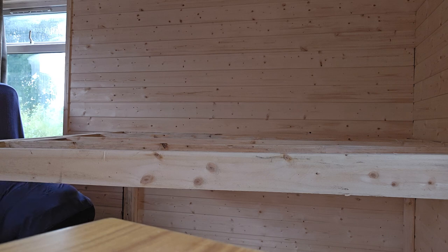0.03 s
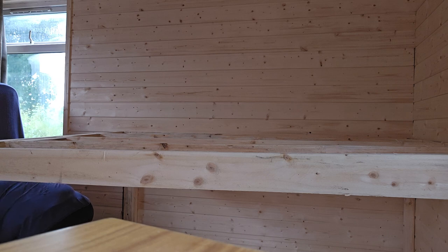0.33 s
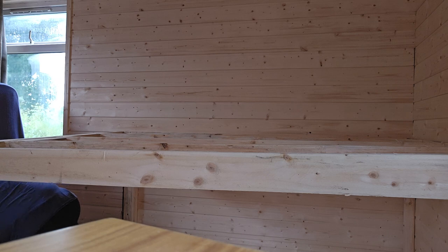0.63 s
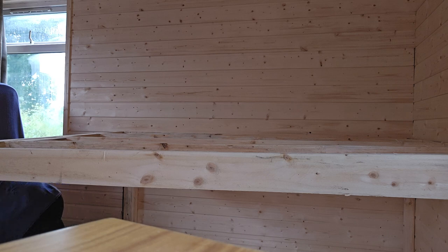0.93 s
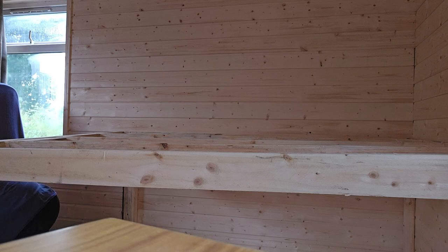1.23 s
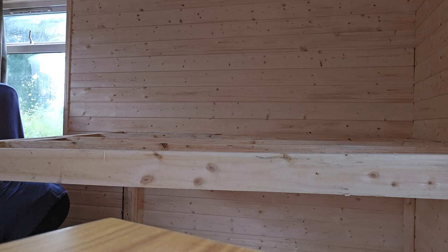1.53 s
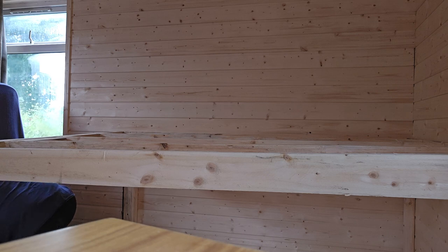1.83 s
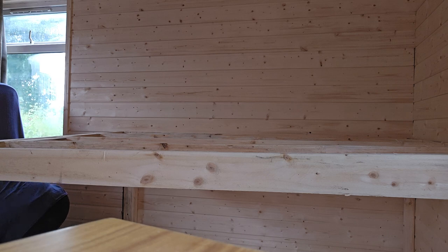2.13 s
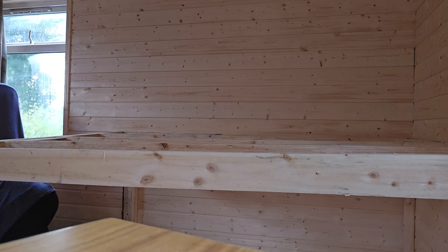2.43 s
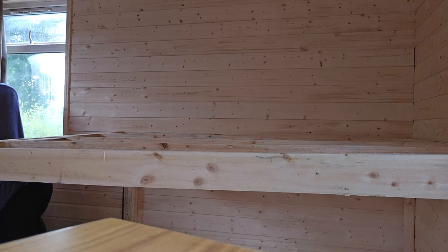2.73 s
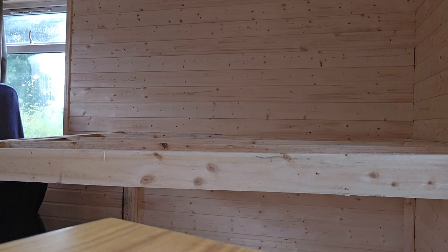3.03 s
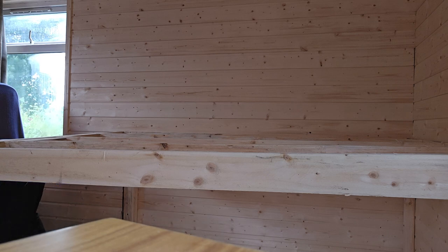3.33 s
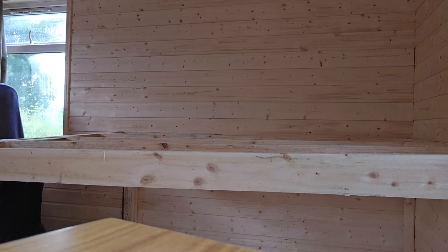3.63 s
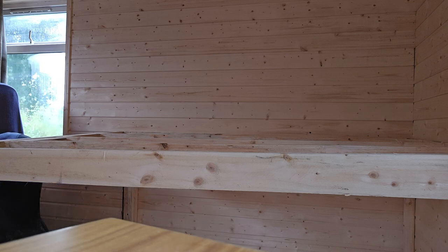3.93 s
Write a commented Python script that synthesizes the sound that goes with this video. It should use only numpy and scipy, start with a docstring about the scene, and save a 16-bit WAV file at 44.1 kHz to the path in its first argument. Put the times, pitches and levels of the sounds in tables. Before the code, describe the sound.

A wooden part drags and groans, then thumps down in a small wood-panelled room.

```python
"""A wooden part scrapes and groans over boards, then is set down with a thump. Light knocks and ticks
follow, then clothing rustles while the floor booms under shifting weight. Stick-slip and blows ring
the same board and floor modes; sliding wood and cloth hiss through tiny catches.
Small wood-panelled room, short reverb, low rumble and hum throughout."""
import sys
import numpy as np
from scipy import signal
from scipy.fft import rfft, irfft
from scipy.io import wavfile

SR = 44100
rng = np.random.default_rng(int(sys.argv[2]) if len(sys.argv) > 2 else 0)


def unload_wav(signal):
    """Save mono or channel-first audio to the path in sys.argv[1] as 16-bit WAV at rate SR, clipped to [-1, 1]."""
    wavfile.write(
        sys.argv[1],
        SR,
        np.round(np.clip(np.atleast_2d(signal).T, -1, 1) * 32767).astype(np.int16),
    )


N = 176400
T = np.arange(N) / SR

# background spectrum: f/Hz, level/dB
AMBIENCE_SPECTRUM = [(20, -7.5), (62, 2), (85, -7), (130, -13.5), (260, -20), (450, -25), (800, -25),
                     (1000, -29.5), (2400, -36), (7400, -39.5), (9800, -57.5), (15500, -51.5)]
# left-right likeness of diffuse sound: f/Hz, correlation/1
CORRELATION = [(60, 0.79), (130, 0.85), (260, 0.61), (500, 0.52), (1000, 0), (16000, 0.09)]
# cloth strokes: t/s, attack/s, hold/s, release/s, fibre level/dB, rub level/dB
CLOTH_STROKES = [(0.852, 0.15, 0.037, 0.05, -62.5, -60.5), (1.054, 0.023, 0.0068, .012, -57.5, -54),
                 (1.542, 0.018, 0.033, 0.089, -75, -86), (1.616, 0.063, 0.019, 0.052, -70, -71.5),
                 (1.874, 0.0093, 0.015, 0.032, -68, -73), (2.332, 0.036, 0.008, 0.12, -72, -58.5),
                 (2.452, 0.034, 0.036, 0.25, -75.5, -70), (2.704, 0.14, 0.034, 0.03, -73, -69),
                 (2.882, 0.014, 0.011, 0.018, -68, -63), (2.852, 0.1, 0.073, 0.21, -57, -59.5),
                 (3.15, 0.055, 0.098, 0.028, -57, -62.5), (3.327, 0.0095, 0.013, 0.067, -60.5, -57.5),
                 (3.432, 0.057, 0.028, 0.062, -56, -55.5), (3.527, 0.04, 0.01, 0.071, -72, -65),
                 (3.803, 0.064, 0.059, 0.14, -74, -73.5)]
# fibre hiss: f/Hz, level/dB
FIBRE_SPECTRUM = [(300, -6.5), (1400, -11), (2500, -9), (3500, -1), (5100, 2.5), (6200, -4.5), (7600, -1.5),
                  (9800, -15.5), (15500, -13)]
# dull cloth rub: f/Hz, level/dB
RUB_SPECTRUM = [(80, -2.5), (220, 4), (540, 6), (690, -1.5), (1400, -0.5), (2300, -6), (4000, -9),
                (12000, -47)]
# edge snaps: t/s, level/dB, centre f/Hz
TICK_EVENTS = [(1.074, -48.5, 7300), (1.316, -52.5, 15000), (1.559, -61.5, 8350), (1.885, -69, 7500),
               (2.375, -64, 4500), (2.524, -66, 4970), (3.352, -44.5, 4600), (3.908, -62.5, 5500)]
# board modes: f/Hz, level/dB, T60/s
BOARD_MODES = [(160, -0.5, 0.18), (213.5, 0.5, 0.17), (260.7, -2, 0.14), (340.8, -8.5, 0.15),
               (457.5, -4, 0.11), (522.6, -12.5, 0.7), (569.4, -5, 0.13), (662, -16.5, 0.53),
               (795, -14.5, 0.22), (1060, -3.5, 0.2), (1235, -20, 0.17), (1597, -31, 0.05),
               (2090, -17, 0.069)]
# floor and room-air modes: f/Hz, level/dB, T60/s
FLOOR_MODES = [(47.7, -26, 0.082), (66.5, 2.5, 0.18), (97.4, -7, 0.13)]
# jolts, knocks, weight shifts: t/s, floor level/dB, board level/dB, crack level/dB,
# contact time/ms, favoured f/Hz
BLOWS = [(0.195, -33.5, -54, -46, 1.1, 200), (.271, -36, -32, -68, 0.43, 437),
         (0.46, -38.5, -36, -42.5, 0.76, 250), (1.060, -36.5, -36.5, -43, 0.65, 380),
         (1.080, -25, -46.5, -46, 0.53, 170), (1.090, -65, -34.5, -34.5, 0.48, 189),
         (1.102, -26.5, -34.5, -65, 0.97, 177), (1.109, -37, -55, -46.5, 0.31, 644),
         (1.124, -29.5, -45, -58, 0.79, 240), (1.723, -70, -52.5, -58.5, 0.74, 208),
         (1.891, -39.5, -37.5, -61.5, 1.05, 274), (1.947, -38.5, -53, -63, 1.44, 151),
         (2.386, -67, -56, -66, 0.21, 283), (2.522, -68, -61, -58, 0.13, 1230),
         (2.94, -39, -50, -79, 1.2, 150), (3.004, -38, -69, -77, 0.92, 151),
         (3.088, -37.5, -57, -62, 0.64, 200), (3.269, -33, -64, -95, 1.6, 149),
         (3.301, -31, -52, -77, 1.5, 150), (3.344, -30, -36, -76, 1.4, 151),
         (3.381, -23, -53, -76, 2.24, 150), (3.397, -31.5, -48, -67, 1.46, 150),
         (3.915, -36, -40.5, -71, 2.33, 152)]
# crack of a hard contact: f/Hz, level/dB
CRACK_SPECTRUM = [(100, -4), (400, 11.5), (1100, 0), (1900, -4.5), (3000, -12), (5000, -19.5), (9000, -29),
                  (16000, -53)]
# groans and squeaks: t/s, length/s, f/Hz, level/dB
GROAN_EVENTS = [(0.07, 0.087, 151, -51), (0.172, 0.23, 663, -52), (0.353, 0.058, 1033, -52.5),
                (0.373, 0.36, 800, -60), (0.42, 0.13, 1535, -57), (0.576, 0.066, 1660, -58),
                (0.517, 0.096, 1440, -55.5), (0.618, 0.14, 205.4, -48), (1.891, .04, 785, -66),
                (2.889, 0.05, 1300, -62), (2.891, 0.063, 1155, -67), (3.282, 0.025, 5380, -56),
                (3.339, 0.034, 4620, -55.5)]
# drag envelopes: t/s, hiss level/dB, judder level/dB
DRAG_LEVELS = [(.02, -90, -84.5), (.05, -61, -59), (.12, -51.5, -45), (.2, -52.5, -41.5), (.36, -49, -40),
               (.42, -51, -49), (0.601, -51.5, -44), (0.657, -58.5, -55.5), (.72, -72, -68.5),
               (.78, -84, -78)]
# floor rumble under the drag: t/s, level/dB
RUMBLE_LEVELS = [(0.039, -57.5), (.1, -37), (0.18, -30.5), (.24, -44.5), (.34, -34), (.45, -41.5),
                 (.57, -37.5), (.65, -47), (.74, -48), (.8, -70)]
# sliding hiss: f/Hz, level/dB
SLIDE_SPECTRUM = [(150, -1), (400, 5), (680, 10), (900, 2.5), (1070, 3.5), (1300, 4.5), (1590, 3.5),
                  (2400, 0), (3500, 0), (5200, 0.5), (7500, -5), (9500, -18.5), (15500, -18.5)]
# stick-slip judder: f/Hz, level/dB
JUDDER_SPECTRUM = [(30, -10.5), (110, -0.5), (220, 2), (450, 0), (900, -12.5), (1600, -16.5), (3000, -52)]

ROOM_T60_S, TREBLE_T60_S = 0.31, 0.12
BOARD_WET_DB, FLOOR_WET_DB = -7, -10.5


def amp(db):
    """dB to gain."""
    return 10 ** (np.asarray(db) / 20)


def unit_rms(x):
    """Scale to rms 1."""
    return x / np.sqrt(np.mean(x ** 2))


def on_bins(points, size):
    """(f/Hz, value) table on FFT bins, log-f interpolation."""
    hz, value = np.array(points, float).T
    return np.interp(np.log(np.fft.rfftfreq(size, 1 / SR) + 1), np.log(hz), value)


def colour(x, spectrum):
    """Minimum-phase filter through (f/Hz, level/dB) points."""
    size = 2 * N
    cepstrum = irfft(np.log(amp(on_bins(spectrum, size))))
    cepstrum[1:N] *= 2
    cepstrum[N:] = 0
    return irfft(rfft(x, size) * np.exp(rfft(cepstrum)))[..., :N]


def decay(t, t60_s):
    """Exponential decay."""
    return np.exp(-np.log(1000) * t / t60_s)


def envelope(times_s, levels_db):
    """Gain through the points, zero outside."""
    return amp(np.interp(T, times_s, levels_db)) * (T > times_s[0]) * (T < times_s[-1])


def convolve(x, response):
    """Convolution cut to N samples."""
    return signal.fftconvolve(x, response)[:N]


def ring(force, modes):
    """Drive damped modes with a force."""
    t = T[:SR]
    response = sum(amp(db) * np.sin(2 * np.pi * hz * t) * decay(t, t60_s) for hz, db, t60_s in modes)
    return convolve(force, response)


def add(out, start_s, x):
    """Mix x in at start_s."""
    i = int(start_s * SR)
    out[i:i + len(x)] += x[:N - i]


def grains(per_s, spread_db):
    """Random micro-impacts of uneven size."""
    impulses = (rng.random(N) < per_s / SR) * rng.choice([-1, 1], N)
    return impulses * amp(spread_db * np.clip(rng.standard_normal(N), -2, 2))


def diffuse_noise():
    """Stereo noise: bass correlated, treble independent."""
    correlation = on_bins(CORRELATION, N)
    weights = np.sqrt([1 + correlation, 1 - correlation])
    mid, side = irfft(rfft(rng.standard_normal((2, N))) * weights)
    return np.array([mid + side, mid - side]) / np.sqrt(2)


def room(x, wet_db, split_hz=2500, rise_s=0.004):
    """Direct sound plus dense panel reflections; treble dies first."""
    t, noise = T[:SR], diffuse_noise()[:, :SR]
    low = signal.sosfilt(signal.butter(2, split_hz, fs=SR, output="sos"), noise)
    high = signal.sosfilt(signal.butter(2, split_hz, "high", fs=SR, output="sos"), noise)
    tail = (low * decay(t, ROOM_T60_S) - high * decay(t, TREBLE_T60_S)) * np.minimum(t / rise_s, 1)
    wet = np.array([convolve(x, side / np.linalg.norm(side)) for side in tail])
    return (x + amp(wet_db) * wet) / np.hypot(1, amp(wet_db))


def ambience(rumble_db=-58, hum_db=-59, hum_hz=61.5):
    """Diffuse rumble plus a steady drone in the lowest room resonance."""
    rumble = amp(rumble_db) * unit_rms(colour(diffuse_noise(), AMBIENCE_SPECTRUM))
    return rumble + amp(hum_db) * np.sqrt(2) * np.sin(2 * np.pi * hum_hz * T)


def flutter(depth_db, per_s=40):
    """Uneven contact pressure, as a gain."""
    return amp(depth_db * np.interp(T * per_s, np.arange(SR), rng.standard_normal(SR)))


def friction(gain, spectrum, flutter_db=1.06, panel_t60_s=0.18, panel_db=5, wet_db=12.5):
    """Moving contact: tiny catches, smeared by the room, coloured by dense panel ringing."""
    catches = unit_rms(grains(per_s=2500, spread_db=-2))
    direct_energy = (catches * flutter(flutter_db) * gain) ** 2
    tail = decay(T[:SR], TREBLE_T60_S) ** 2
    room_energy = np.abs(convolve(direct_energy, tail / tail.sum()))
    wet_ratio = amp(wet_db) ** 2
    energy = (direct_energy + wet_ratio * room_energy) / (1 + wet_ratio)
    rubbing = rng.standard_normal(N)
    panel_response = diffuse_noise()[:, :SR] * decay(T[:SR], panel_t60_s)
    panel = unit_rms(np.array([convolve(rubbing, side) for side in panel_response]))
    hiss = unit_rms(colour(diffuse_noise() + amp(panel_db) * panel, spectrum))
    return np.sqrt(energy) * hiss


def rustle():
    """Cloth strokes on wood: fibre hiss over a duller, more uneven, hollow rub."""
    fibre_gain, rub_gain = np.zeros((2, N))
    for start_s, attack_s, hold_s, release_s, fibre_db, rub_db in CLOTH_STROKES:
        stroke = np.interp(T, start_s + np.cumsum([0, attack_s, hold_s, release_s]), [0, 1, 1, 0])
        fibre_gain += amp(fibre_db) * stroke
        rub_gain += amp(rub_db) * stroke
    fibres = friction(fibre_gain, FIBRE_SPECTRUM)
    return fibres + friction(rub_gain, RUB_SPECTRUM, flutter_db=2.15, panel_t60_s=0.33)


def ticks(t60_s=0.021, skirt_db=-8.5):
    """Edges catch and release: brief bright snaps."""
    out, t = np.zeros(N), T[:SR // 4]
    for start_s, db, hz in TICK_EVENTS:
        band = [(hz / 8, 3 * skirt_db), (hz / 2, skirt_db), (hz, 0),
                (hz * 2, skirt_db), (hz * 4, 2 * skirt_db)]
        snap = irfft(rfft(rng.standard_normal(SR)) * amp(on_bins(band, SR)))[:len(t)]
        add(out, start_s, amp(db) * unit_rms(snap) * decay(t, t60_s))
    return room(out, wet_db=0)


def groans(base_width_hz=18, width_share=0.04):
    """Stick-slip locks onto a resonance: a rough narrow tone swells and fades."""
    out = np.zeros(N)
    bins_hz = np.fft.fftfreq(N, 1 / SR)
    for start_s, length_s, hz, db in GROAN_EVENTS:
        width_hz = base_width_hz + width_share * hz
        band = np.exp(-((bins_hz - hz) / width_hz) ** 2)
        analytic = np.fft.ifft(np.fft.fft(rng.standard_normal(N)) * band)
        tone = unit_rms(np.real(analytic / np.sqrt(np.abs(analytic))))  # envelope compressed 2:1
        swell = np.sin(np.pi * np.clip((T - start_s) / length_s, 0, 1))
        out += amp(db) * swell * tone
    return room(out, BOARD_WET_DB)


def struck_modes(favoured_hz, lift_db=10, width_oct=0.6):
    """Strike position lifts the board modes near one pitch."""
    return [(hz, db + lift_db * np.exp(-(np.log2(hz / favoured_hz) / width_oct) ** 2), t60_s)
            for hz, db, t60_s in BOARD_MODES]


def knocks(crack_rise_s=0.003, crack_t60_s=0.072):
    """Blows push floor and boards, soft contacts more slowly; hard ones also crack."""
    floor_force, board, crack_gain = np.zeros((3, N))
    t = T[:SR // 4]
    crack_shape = decay(t, crack_t60_s) * np.minimum(t / crack_rise_s, 1)
    for start_s, floor_db, board_db, crack_db, contact_ms, favoured_hz in BLOWS:
        push = t * np.exp(-t * 1000 / contact_ms)
        push /= push.sum()
        add(floor_force, start_s, amp(floor_db) * push)
        add(board, start_s, amp(board_db) * ring(push, struck_modes(favoured_hz)) / 2)
        add(crack_gain, start_s, amp(crack_db) * crack_shape)
    floor = ring(floor_force, FLOOR_MODES)
    crack = crack_gain * unit_rms(colour(rng.standard_normal(N), CRACK_SPECTRUM))
    return room(floor, FLOOR_WET_DB) + room(board, BOARD_WET_DB) + room(crack, wet_db=-4.5)


def drag(dead_wood_db=-8):
    """Wood sticks and slips on wood: slips ring boards and floor, the grain hisses."""
    times_s, hiss_db, judder_db = np.array(DRAG_LEVELS).T
    slips = grains(per_s=190, spread_db=4.5)
    dull_slips = colour(slips, JUDDER_SPECTRUM)
    wood = unit_rms(ring(slips, BOARD_MODES)) + amp(dead_wood_db) * unit_rms(dull_slips)
    judder = unit_rms(colour(wood, JUDDER_SPECTRUM)) * envelope(times_s, judder_db)
    rumble = unit_rms(ring(dull_slips, FLOOR_MODES)) * envelope(*np.array(RUMBLE_LEVELS).T)
    scrape = room(judder, wet_db=3) + friction(envelope(times_s, hiss_db), SLIDE_SPECTRUM)
    return scrape + room(rumble, FLOOR_WET_DB)


def scene(balance_db=0.5, left_lag_ms=0.16):
    """Background plus all contacts; left slightly louder and later."""
    left, right = ambience() + drag() + groans() + knocks() + ticks() + rustle()
    left = np.pad(left, (int(left_lag_ms * SR / 1000), 0))[:N]
    return np.array([left * amp(balance_db / 2), right * amp(-balance_db / 2)])


def record(dry, low_hz=33, top_hz=15800):
    """Band limit: deepest bass and top treble cut."""
    thin = signal.sosfilt(signal.butter(4, low_hz, "high", fs=SR, output="sos"), dry)
    return signal.sosfilt(signal.ellip(10, .2, 70, top_hz, fs=SR, output="sos"), thin)


dry = scene()
out = record(dry)
unload_wav(out)
```